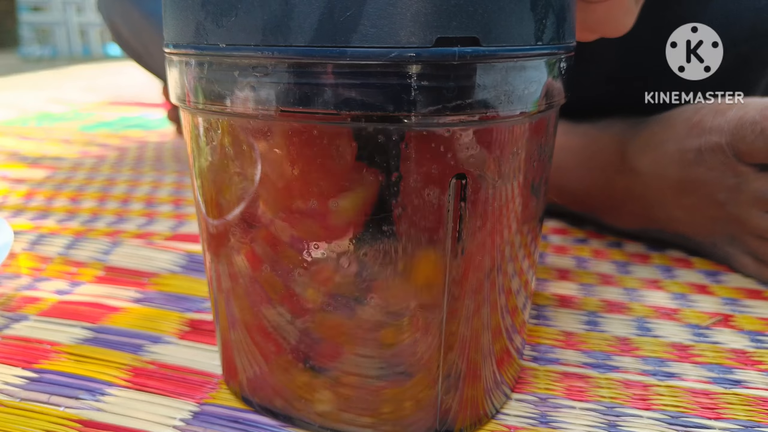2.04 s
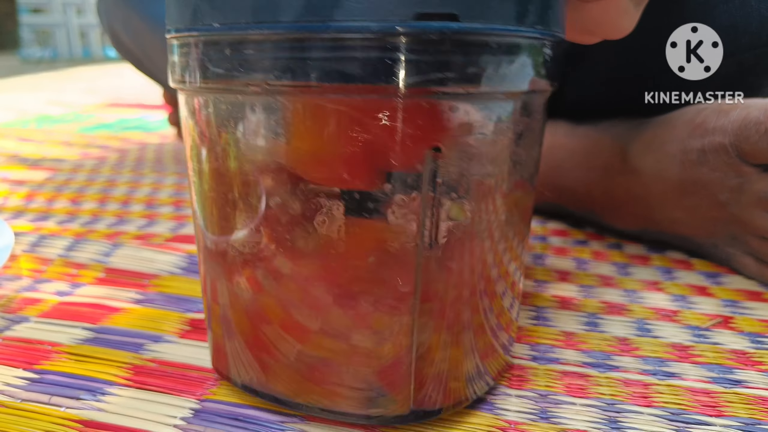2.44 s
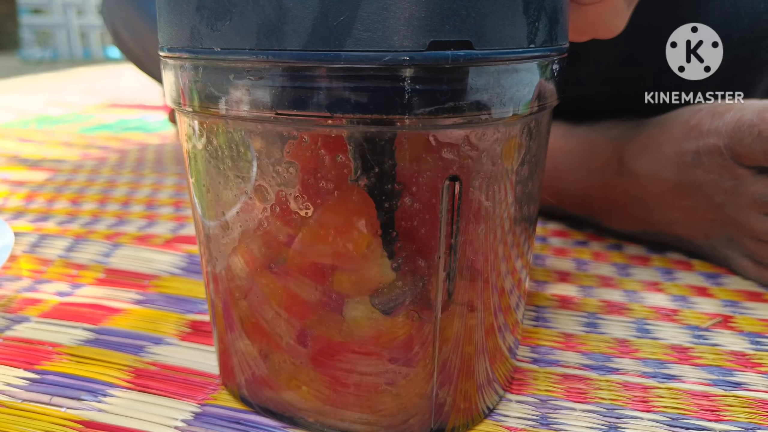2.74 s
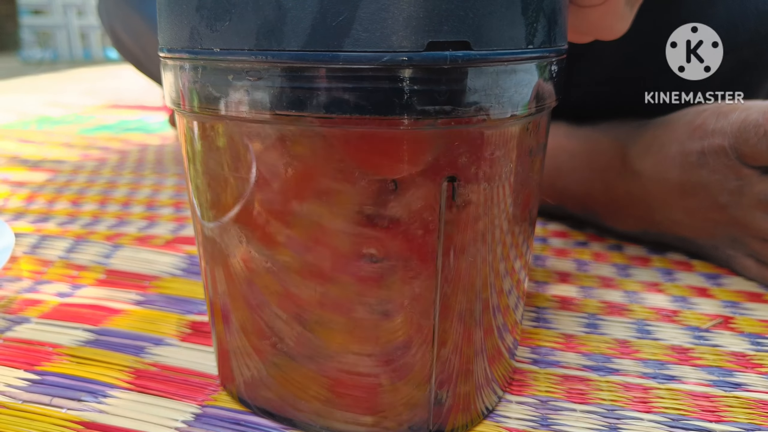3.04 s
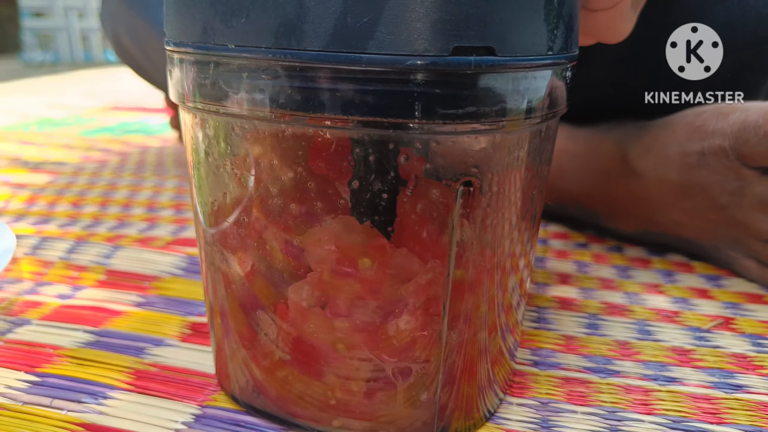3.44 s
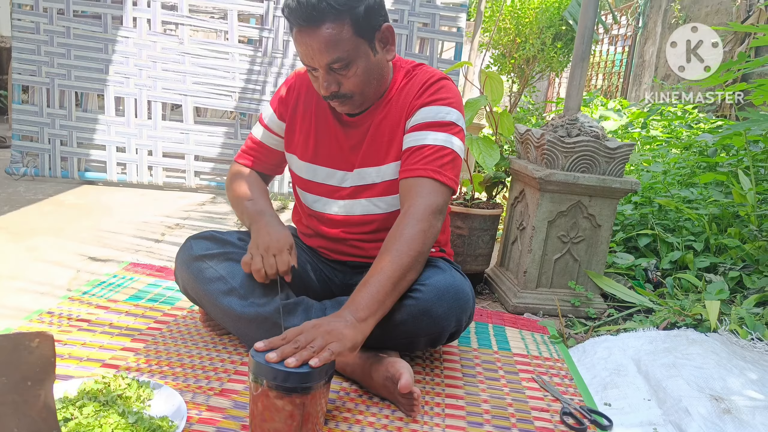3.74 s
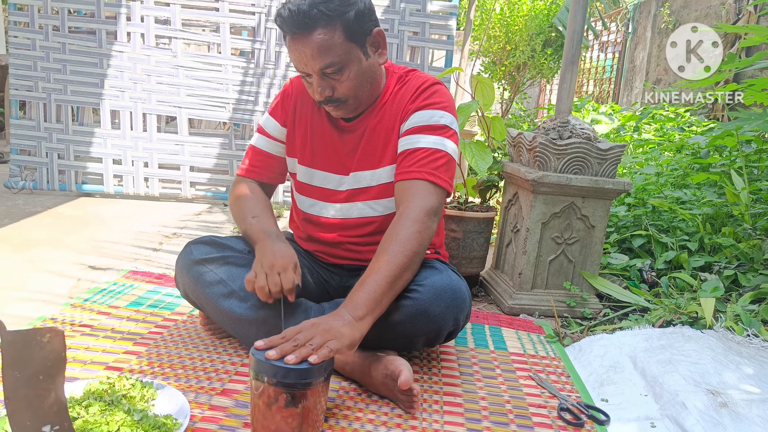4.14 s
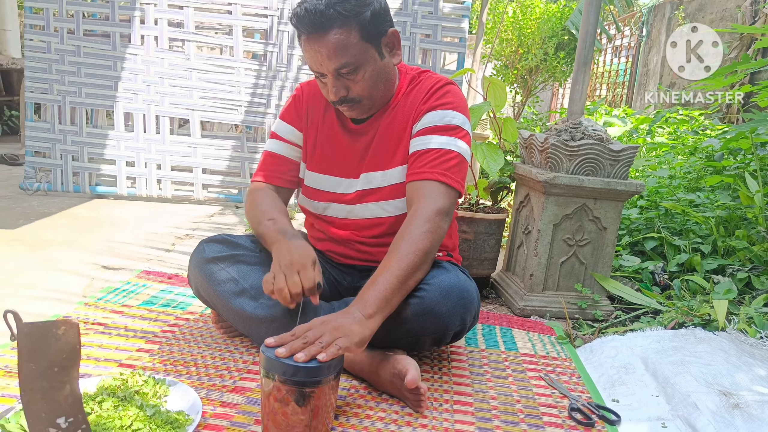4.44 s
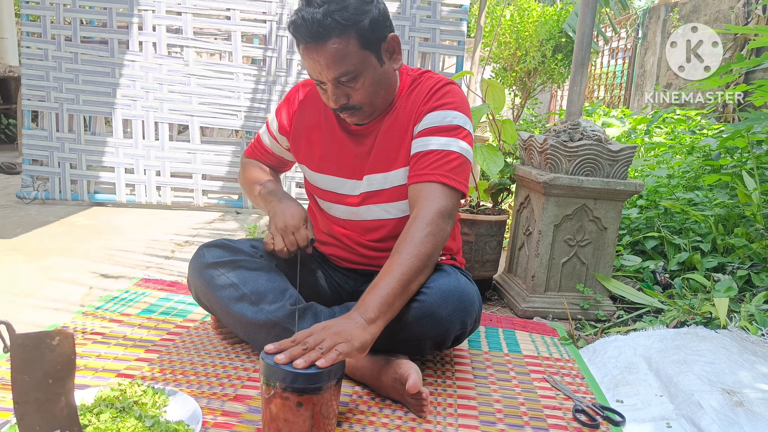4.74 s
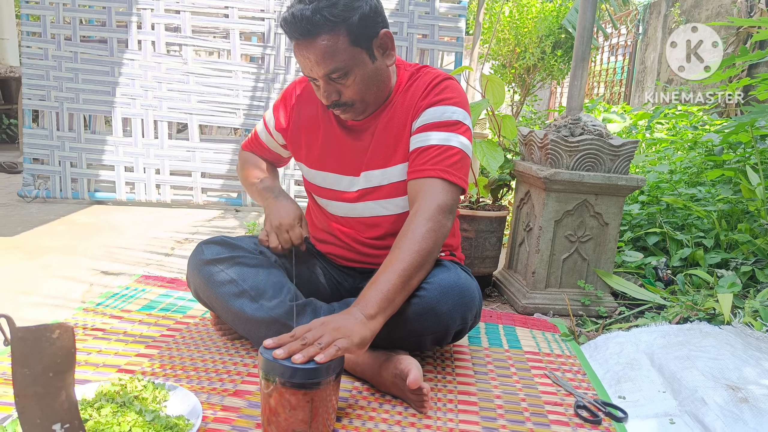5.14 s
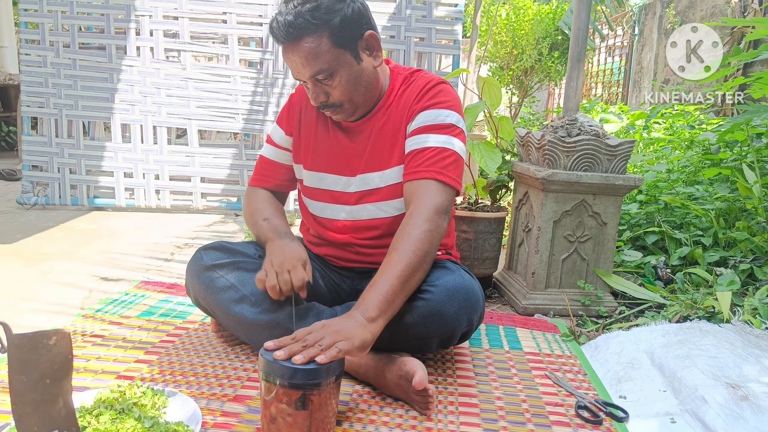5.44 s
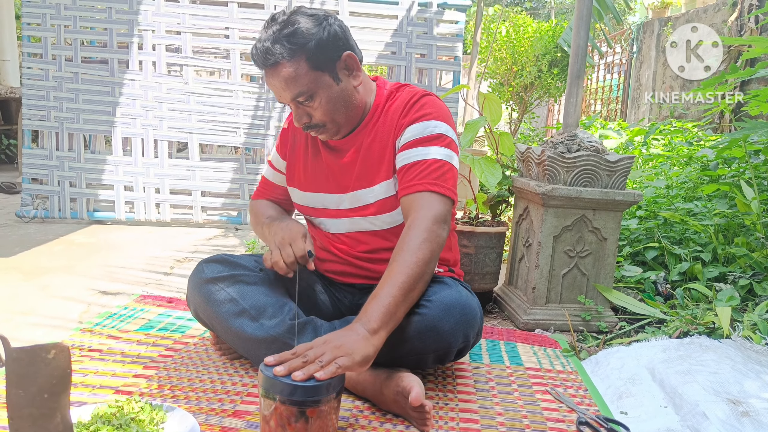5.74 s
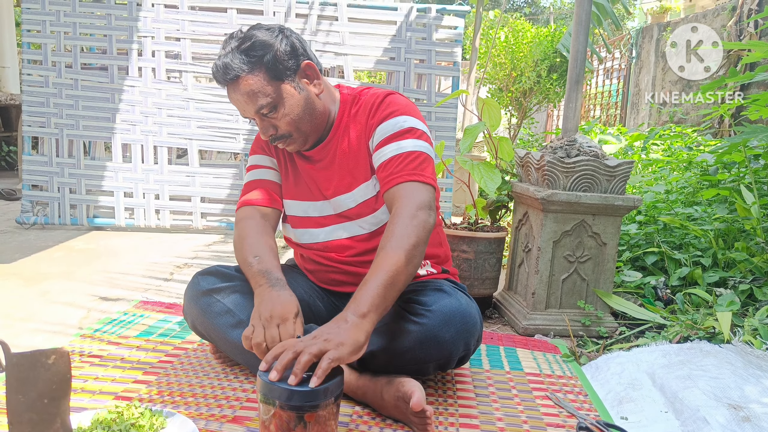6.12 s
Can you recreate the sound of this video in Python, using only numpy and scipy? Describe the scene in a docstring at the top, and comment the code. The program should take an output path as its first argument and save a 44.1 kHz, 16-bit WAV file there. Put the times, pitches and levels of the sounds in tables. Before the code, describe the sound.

Close stereo microphones catch a cord-driven vegetable chopper: hollow plastic knocking, gritty gear whir and wet pulp fizz on every pull, then a thinner ticking zip as the cord winds back. About two pulls come every 1.2 seconds at first. Then the view jumps back and the same action is softer, thinner and slightly faster, with a short yard reflection, quiet outdoor murmur and a brief breathy whistle at the end.

```python
"""Pull-cord food chopper in a yard

A hand pulls the cord of a food chopper on a mat outdoors, heard first from close by, then from a step away.
The clutch clacks as strokes set in; gears and blades grind and knock, ringing the modes of the plastic jar.
The ratchet ticks in the lid, clearest while the spring winds the cord back; cord and pulp fizz above.
Near the end a rough whistle, narrowly resonant noise, sounds over the quiet coloured noise of the open air."""
import sys
import numpy as np
from scipy import signal
from scipy.fft import rfft, irfft, next_fast_len
from scipy.io import wavfile
from scipy.ndimage import uniform_filter1d

SR = 44100
rng = np.random.default_rng(int(sys.argv[2]) if len(sys.argv) > 2 else 0)


def bounce(signal):
    """Save signal as a 16-bit WAV file at the path given by the first command-line argument."""
    frames = np.transpose(np.atleast_2d(signal))
    limited = np.clip(frames, -1, 1)
    pcm = np.round(limited * 32767).astype(np.int16)
    wavfile.write(sys.argv[1], SR, pcm)


N = 277075
FAR_FROM_S = 3.62  # from here on the chopper is heard from a step away


def gain_of(db):
    """Turns decibels into an amplitude factor."""
    return 10 ** (np.asarray(db) / 20)


def evened(x):
    """Brings a signal to an RMS of one."""
    return x / np.sqrt(np.mean(x ** 2) + 1e-20)


def curve(rows):
    """Joins rows (time [s], value, ..) by straight lines, one value a sample."""
    s, *columns = np.transpose(rows)
    return [np.interp(np.arange(N) / SR, s, c) for c in columns]


def blend(a, b, same):
    """Two channels from independent noises a and b, alike by the share same."""
    return np.array([a, same * a + np.sqrt(1 - same ** 2) * b])


def pair(count, same):
    """White noise for two microphones, alike by the share same."""
    a, b = rng.standard_normal((2, count))
    return blend(a, b, np.clip(same, 0, 1))


def slow_swing(span):
    """Slow random swing of RMS one: noise averaged twice over span samples."""
    return evened(uniform_filter1d(uniform_filter1d(rng.standard_normal(N), span), span))


def through(drive, body):
    """Plays a drive through the impulse response of a body, channel by channel."""
    return signal.oaconvolve(drive, body, axes=1)[:, :N]


def ring(modes, struck_hz=None, octaves=1.2):
    """Damped modes of a body after one click at both microphones; a blow favours those near struck_hz."""
    t, out = np.arange(1024) / SR, 0
    for k, (hz, width, left_db, right_db) in enumerate(modes):
        favour = 1
        if struck_hz is not None:
            favour = np.exp(-(np.log2(hz / struck_hz) / octaves) ** 2)
        mode = width * np.exp(-np.pi * width * t) * np.sin(2 * np.pi * hz * t)
        out = out + (-1) ** k * favour * gain_of([[left_db], [right_db]]) * mode
    return out / np.linalg.norm(out.mean(0))


def rattle(per_s, spread_db, grain_ms, same, smooth):
    """Uneven contacts: short noise bursts of random size, over a share of smooth rubbing."""
    size = gain_of(spread_db * np.minimum(rng.exponential(1, N), 4))
    size = size * (rng.random(N) < per_s / SR)
    spot, out = rng.integers(0, 16, N), np.zeros((2, N))
    t_ms = np.arange(400) / SR * 1000
    swell_and_fade = np.exp(-t_ms / grain_ms) * (1 - np.exp(-t_ms / (0.45 * grain_ms)))
    for k in range(16):  # every spot of contact weighs the modes in its own way
        burst = pair(count=400, same=same) * swell_and_fade
        out += through((size * (spot == k))[None], burst / np.linalg.norm(burst[0]))
    smooth = np.clip(smooth, 0, 1)
    return np.sqrt(1 - smooth) * evened(out) + np.sqrt(smooth) * pair(count=N, same=same)


# colour of the outdoor air: (frequency [Hz], relative level per Hz [dB])
AIR_COLOUR = [(20, -4), (40, -1), (110, 1.5), (170, -8.5), (300, 2.5), (550, -10), (700, -7.5),
              (1700, -13.5), (2500, -13.5), (3300, -22), (9000, -29), (15000, -46)]
# slow rise of the air and its sinking at the end: (time [s], level change [dB])
AIR_SWELL = [(0, -1.5), (5.9, 2.5), (6.28, -6)]
AIR_DB = -52  # RMS before the slow swell


def air():
    """Outdoor murk of coloured noise, alike in the bass and unrelated in the treble."""
    hz, (f, db) = np.fft.rfftfreq(N, 1 / SR), np.transpose(AIR_COLOUR)
    a, b = rfft(rng.standard_normal((2, N)), axis=1)
    same = .93 * np.exp(-hz / 2500)
    colour_db = np.interp(np.log(hz + 1), np.log(f + 1), db)
    murk = irfft(blend(a, b, same) * gain_of(colour_db), N, axis=1)
    return gain_of(AIR_DB + curve(AIR_SWELL)[0]) * evened(murk)


YARD_T60_S, YARD_DB = 0.058, -12


def yard(x):
    """Fence, wall and plants nearby scatter a short faint tail, another one to each microphone."""
    t = np.arange(SR // 5) / SR
    tail = rng.standard_normal((2, len(t))) * gain_of(-60 * t / YARD_T60_S) * (t > .004)
    return gain_of(YARD_DB) * through(x, tail / np.linalg.norm(tail[0]))


# glide of the whistle: (time [s], pitch [Hz], level before panning [dB])
WHISTLE_GLIDE = [(5.86, 2230, -79), (5.898, 2520, -53.5), (6.004, 2580, -62), (6.01, 2440, -50),
                 (6.114, 2270, -42.5), (6.124, 2360, -50.5), (6.182, 2540, -48.5), (6.218, 2400, -66),
                 (6.24, 2290, -59)]


def whistle():
    """Noise in a narrow wandering resonance, fluttering, mostly on the right."""
    hz, db = curve(WHISTLE_GLIDE)
    turn = np.exp(2j * np.pi * np.cumsum(hz) / SR)
    r = np.exp(-np.pi * 260 / SR)  # each smoothing pass is 260 Hz wide
    # shifted down by the pitch, smoothed around zero, shifted back up
    x = rattle(150, spread_db=-2.5, grain_ms=5.6, same=0.48, smooth=0.33) / turn
    for _ in range(2):
        x = signal.lfilter([1 - r], [1, -r], x)
    t = np.arange(N)
    sounding = (t > WHISTLE_GLIDE[0][0] * SR) & (t < WHISTLE_GLIDE[-1][0] * SR)
    return gain_of(db) * evened((turn * x).real) * gain_of([[-7], [4]]) * sounding


# colour of the fizz at both microphones:
# (frequency [Hz], width [Hz], relative level left [dB], relative level right [dB])
FIZZ_MODES = [(6700, 530, -48, 3.5), (8350, 2000, -0.5, 1.5), (9360, 1350, 3.5, -1.5),
              (12900, 480, -14, -12), (14500, 2300, -34, -18.5)]


def fizz_body():
    """Broad treble resonances that colour the fizz of cord and pulp."""
    return ring(FIZZ_MODES)


# modes of jar and lid, from close by and from a step away:
# (frequency [Hz], width [Hz], relative level left [dB], relative level right [dB])
JAR_NEAR_MODES = [(131, 270, -16, -11), (417, 83.7, 7, 2), (703.5, 111, 1, 0), (1027.4, 113, 2.5, 2.3),
                  (1310, 174, 4.5, 2), (1483, 304, 2.5, 1.5), (2090, 785, -9.5, -9.5),
                  (3930, 610, -17.5, -17.5)]
JAR_FAR_MODES = [(336, 88, -5.5, -3.5), (491, 61, 4.5, 4), (654, 168, -6.5, -5), (1150, 111, -0.9, -4.1),
                 (1388, 284, -10, -11.5), (1650, 120, -7.5, -8), (1960, 184, -9.5, -1.5),
                 (2284, 320, -17.5, -5), (2816, 290, -22.5, -9)]
LID_NEAR_MODES = [(3550, 1460, -11.5, -5), (4075, 1400, -38, -0.5), (5160, 700, -45, -4.5),
                  (5580, 267, -8, 4.5), (5515, 1200, -34, -0.5)]
LID_FAR_MODES = [(3970, 4500, -8, -4), (4410, 220, 3.5, 6), (4700, 190, -13, 0), (5120, 390, 2.5, 5.5),
                 (5770, 250, -6, -2.5)]
GROUND_MS, GROUND_SHARE = 0.6, 0.38  # from afar the mat throws the jar back a little later


def bodies(far, **struck):
    """Jar and lid as heard from either place; the small jar radiates no deep bass."""
    bass_cut = signal.butter(2, 260 if far else 90, "high", fs=SR)
    jar = signal.lfilter(*bass_cut, ring(JAR_FAR_MODES if far else JAR_NEAR_MODES, **struck))
    if far:
        late = round(GROUND_MS * SR / 1000)
        jar = jar + GROUND_SHARE * np.pad(jar, ((0, 0), (late, 0)))[:, :jar.shape[1]]
    lid = ring(LID_FAR_MODES if far else LID_NEAR_MODES, **{})
    return jar / np.linalg.norm(jar.mean(0)), lid


def blows(rows):
    """Each blow is a short chatter that swells and stops; it rings jar, lid and fizz."""
    out, t_ms = np.zeros((2, N + 4096)), np.arange(1024) / SR * 1000
    edge = fizz_body()
    for s, jar_db, lid_db, fizz_db, ms, hz in rows:
        shape = (1 - np.exp(-t_ms / (0.5 * ms))) * np.exp(-(t_ms / (1.43 * ms)) ** 2)
        late_shape = shape * (1 - np.exp(-t_ms / (0.32 * ms)))  # lid and fizz swell later
        jar, lid = bodies(s > FAR_FROM_S, struck_hz=hz, octaves=2.68)
        low = through(shape * pair(count=1024, same=0.97), jar)
        high = through(late_shape * pair(count=1024, same=0.27), lid + gain_of(fizz_db) * edge)
        low, high = low / abs(low.mean(0)).max(), high / abs(high.mean(0)).max()
        sound = gain_of(jar_db) * low + gain_of(lid_db) * high
        out[:, round(s * SR):][:, :sound.shape[1]] += sound
    return out[:, :N]


# clearest clicks of the ratchet, the first being a faint click that leads into the first clutch clack: (time
# [s], peak in the lid [dB], jar part against it [dB], # fizz against the lid modes [dB], chatter length [ms])
RATCHET_CLICKS = [(0.0204, -36, 10, -2, 4.6), (0.4219, -35, 18, -4, 3.7), (0.4466, -28, -4, -5, 2.7),
                  (0.4597, -24.5, 4.5, -9, 3.5), (0.4967, -30, -5, -6, 4.2), (0.5701, -27, 3, 0, 3.5),
                  (1.093, -29.5, -10, -12, 3.5), (1.1213, -31.5, 5, -10, 3.5), (1.151, -30, 0, -10, 3.5),
                  (1.1654, -26, -6, -7, 2.8), (1.191, -28, -1, -12, 3.2), (1.2198, -28, -4, -9, 4.1),
                  (1.2545, -35, -14, -11, 4), (1.3069, -30.5, 0.5, -8, 4.3), (1.335, -42, 11, -5, 3.9),
                  (1.6891, -33, 12.5, -9, 2.8), (1.715, -40, 16, -4, 2.7), (1.737, -27.5, -12, -14, 2.7),
                  (1.7845, -26, 7.5, -12, 2.8), (1.8233, -25.5, -6, -18, 2.6), (2.2652, -32.5, 5, -6, 3),
                  (2.2886, -30.5, 3.5, -12, 3.2), (2.3639, -19, -3.5, 3, 2.8), (2.4538, -36, 9, -21, 3.1),
                  (2.4998, -27, 3, -20, 4.6), (2.818, -38, 11, -11, 3.9), (2.911, -30, -1, -2, 3.5),
                  (2.9736, -42, 8, -15, 3.1), (3.019, -48, 0, -18, 3.5), (3.3328, -31.5, -15, -11, 3.1),
                  (3.4072, -23.5, -4, -6, 3.4), (3.4288, -25.5, -8, -12, 2.9),
                  (3.4537, -25.5, -12, -9, 3.5), (3.4705, -25, -12, -10, 2.6), (3.501, -25.5, -1, -17, 3.5),
                  (3.6313, -41.5, 13, 3, 3.9), (3.685, -43, -3, 4, 3.5), (3.7, -27, -15, -7, 4),
                  (4.0114, -36, -7, -7, 3.1), (4.086, -35, 0, -7, 3.8), (4.143, -33, 0, -14, 3.5),
                  (4.4488, -38, -1, -13, 3), (4.5775, -32.5, 2, -12, 3.8), (4.8834, -44, -4, -16, 3.2),
                  (4.9327, -33.5, -1, 7, 3.5), (4.9741, -31.5, -6, 3, 3.3), (5.3228, -41, 3, -8, 3.3),
                  (5.3935, -29.5, -1.5, 9, 3.6), (5.4154, -33, -5, 6, 3.5), (5.7834, -40.5, 2.5, -12, 3.8),
                  (5.859, -51, -13, -22, 3.5), (5.9269, -41, -1, -11, 4.3), (5.9863, -49, -3, -18, 3.5),
                  (6.112, -49.5, 8.5, -18, 3.2), (6.1314, -52.5, 9, -16, 3.5), (6.1655, -63, 7, -15, 3.5),
                  (6.197, -55, 9, -18, 3.5)]
CLICK_HZ = 910


def ratchet_clicks():
    """Single ratchet teeth click in the lid and nudge the jar around one pitch; the first click leads into the
    first clack."""
    return blows([(s, db + jar_db, db, fizz_db, ms, CLICK_HZ)
                  for s, db, jar_db, fizz_db, ms in RATCHET_CLICKS])


# the clutch bites as a stroke sets in:
# (time [s], peak in the jar [dB], favoured pitch [Hz], lid part against it [dB])
CLUTCH_CLACKS = [(0.031, -11.5, 1530, -11.5), (0.734, -7.5, 1570, -13), (1.373, -15, 385, -9),
                 (1.972, -6.5, 1310, -11), (2.51, -7, 398, -11.5), (3.065, -11, 466, -8.5),
                 (3.574, -13.5, 1110, -7), (3.785, -20.5, 1650, -9.5), (4.221, -20, 1960, -5),
                 (4.66, -13.5, 484, -9.5), (5.093, -29.5, 1960, 0.5), (5.522, -20.5, 2160, -3)]
CLACK_MS, CLACK_FIZZ_DB = 4.4, -6  # chatter length; fizz against the lid modes


def clutch_clacks():
    """The biting clutch strikes jar and lid with a short chatter."""
    return blows([(s, db, db + lid_db, CLACK_FIZZ_DB, CLACK_MS, hz)
                  for s, db, hz, lid_db in CLUTCH_CLACKS])


# blades and gears hit the jar:
# (time [s], peak in the jar [dB], favoured pitch [Hz], chatter length [ms])
JAR_KNOCKS = [(0.111, -23, 662, 3.1), (0.123, -18, 816, 2.3), (0.188, -11, 400, 1.7), (0.207, -3, 766, 2),
              (0.24, -1, 441, 2.16), (0.276, -7.5, 380, 1.34), (0.329, -20, 514, 4.7),
              (0.772, -7.5, 370, 1.7), (0.824, -16.5, 700, 1.5), (0.866, -9, 471, 1.55),
              (0.877, -4, 1300, 2.6), (0.888, 4.5, 440, 1.4), (0.912, -3.5, 1040, 2.8),
              (0.921, -4, 1400, 2.3), (0.926, -6, 1320, 2.4), (0.93, -9.5, 1050, 1.5),
              (0.97, -9, 1360, 2.6), (0.989, -8.5, 1310, 2.8), (1.452, -12.5, 350, 2.1),
              (1.485, -4, 440, 2.2), (1.498, -31, 638, 2.1), (1.563, -4, 1240, 3.6), (1.593, -6, 1040, 2.2),
              (2.011, -14.5, 1080, 1.9), (2.031, -5, 483, 1.64), (2.045, -8.5, 506, 3.1),
              (2.057, -4, 1640, 3.2), (2.069, -2, 1280, 2.6), (2.081, -4, 1360, 1.8),
              (2.089, -5.5, 1030, 2.4), (2.098, -4.5, 1080, 1.9), (2.137, -6.5, 388, 1.4),
              (2.162, -4, 1400, 2), (2.167, -4.5, 1430, 2.7), (2.568, -9, 573, 1.8),
              (2.628, -11.5, 452, 1.3), (2.647, -10, 1060, 3), (2.66, -5, 1410, 2.2),
              (2.67, -6.5, 1080, 2.3), (2.682, -5.5, 1420, 2.6), (2.702, -12, 423, 3.2),
              (2.736, -15, 380, 3.6), (3.111, -4, 704, 1.8), (3.147, -6.5, 455, 1.7),
              (3.175, -1.5, 1300, 2.3), (3.217, -1.5, 1260, 1.5), (3.243, -2.5, 1090, 2.8),
              (3.664, -20, 2100, 2.9), (3.837, -17.5, 1230, 6.3), (3.849, -19, 1320, 2.1),
              (3.891, -11.5, 1190, 0.9), (3.957, -19, 476, 3.6), (4.325, -17.5, 1180, 2.2),
              (4.364, -20.5, 541, 2.5), (4.405, -27, 490, 1.7), (4.679, -24, 517, 2.1),
              (4.738, -15, 2120, 1.5), (4.761, -15.5, 1200, 0.8), (4.78, -12.5, 1230, 2.1),
              (4.839, -23.5, 1190, 0.7), (5.164, -24, 1140, 1.3), (5.176, -26, 544, 2.8),
              (5.204, -24, 468, 1.8), (5.59, -18.5, 497, 1.3), (5.704, -26, 474, 1.5)]
KNOCK_LID_DB, KNOCK_FIZZ_DB = -33, -15  # lid part against the jar; fizz against the lid modes


def jar_knocks():
    """Blades and gears knock the jar, exciting mostly the modes near each pitch."""
    return blows([(s, db, db + KNOCK_LID_DB, KNOCK_FIZZ_DB, ms, hz)
                  for s, db, hz, ms in JAR_KNOCKS])


COAST_DB_PER_S = (-60, -400, -400)  # after a stroke the blades coast on in the jar; lid and fizz stop
EDGE_S = .008  # a stroke sets in within this time


def strokes(rows, start_db, end_db, bends):
    """Powers of jar, lid and fizz: each stroke speeds up, runs at speed and slows down."""
    t, power = np.arange(N) / SR, np.zeros((3, N))
    for start, rise, hold, fall, *top_db, lean_db in rows:
        u = t - start
        before = np.clip(1 - u / rise, 0, 1)
        after = np.clip((u - rise - hold) / fall, 0, 1)
        db = np.outer(start_db, before ** bends[0]) + np.outer(end_db, after ** bends[1])
        db += np.c_[top_db] + lean_db * np.clip((u - rise) / hold, 0, 1)
        db += np.outer(COAST_DB_PER_S, np.maximum(u - rise - hold - fall, 0))
        power += (np.clip(u / EDGE_S, 0, 1) * gain_of(db)) ** 2
    return power


# pulls of the cord and rewinds by the spring: (start [s], speeding up [s], at speed [s], slowing [s],
# grinding in the jar [dB], rattle of the lid [dB], fizz of cord and pulp [dB], change while at speed [dB])
PULL_STROKES = [(.045, 0.15, 0.12, 0.058, -24, -41.5, -43.5, 8),
                (.75, 0.14, 0.074, 0.13, -18.5, -37.5, -42, -5.5),
                (1.39, 0.13, 0.048, 0.085, -16.5, -38, -43.5, 1),
                (1.985, 0.072, .11, .08, -19, -40, -43, -3), (2.525, 0.13, 0.05, 0.047, -18, -40, -43.5, 0),
                (3.08, 0.029, 0.13, 0.059, -25, -48, -48.5, 8.5),
                (3.8, 0.069, 0.092, 0.064, -23, -49, -52, -9.5),
                (4.235, 0.096, 0.054, 0.079, -27.5, -52.5, -55, -5),
                (4.675, 0.063, 0.088, 0.07, -24, -52.5, -55, -8.5),
                (5.105, 0.076, 0.066, 0.065, -31, -54, -58.5, -3),
                (5.535, 0.043, 0.12, 0.074, -28.5, -53, -57.5, -4.5)]
REWIND_STROKES = [(.42, 0.059, .18, 0.044, -34, -46, -53.5, 2.5),
                  (1.094, 0.077, 0.057, 0.19, -30, -43, -46, -4.5),
                  (1.688, 0.068, .15, 0.065, -29.5, -40.5, -45, -2),
                  (2.265, 0.081, 0.11, 0.042, -30.5, -40, -50, -3),
                  (2.82, 0.049, 0.13, 0.16, -36.5, -53, -57, -3.5),
                  (3.32, 0.021, 0.18, 0.081, -40, -49, -59, 1.5),
                  (3.59, 0.069, 0.028, 0.13, -39, -40, -43, -3.5),
                  (4.01, 0.067, 0.028, 0.16, -40.5, -44, -48, 3),
                  (4.447, 0.093, 0.046, 0.14, -40.5, -41.5, -49.5, -3),
                  (4.882, 0.079, 0.049, 0.091, -44, -46.5, -49, 0),
                  (5.32, 0.089, .06, 0.12, -42, -47.5, -51.5, -2.5),
                  (5.783, .115, 0.08, 0.23, -53.5, -57.5, -70, 1.5)]
# level at the start and at the end of a stroke against full speed: (jar [dB], lid [dB], fizz [dB])
PULL_START_DB, PULL_END_DB = (-18, -16, -12), (-26, -22, -21)
REWIND_START_DB, REWIND_END_DB = (-9.5, -14.5, -21.5), (-18, -21, -30.5)
PULL_BENDS, REWIND_BENDS = (0.68, 0.97), (0.68, 0.9)  # exponents (rise, fall); higher stays near the top longer


def cord_work():
    """Powers of jar, lid and fizz while the hand pulls, and for pulls and rewinds together."""
    pulling = strokes(PULL_STROKES, PULL_START_DB, PULL_END_DB, PULL_BENDS)
    rewinding = strokes(REWIND_STROKES, REWIND_START_DB, REWIND_END_DB, REWIND_BENDS)
    return pulling, pulling + rewinding


# (near, from afar)
GRIND_SPREAD_DB = 3, 3  # unevenness of the contacts
LUMPS_DB = 2.37, 1.0  # RMS of the slow swings
REWIND_CALM = 0.79  # share of the unevenness that is left while the spring rewinds


def grinding(level, is_pull):
    """Gears and blades grind in rough contacts; chunks and gaps swing the level."""
    near = np.arange(N) < FAR_FROM_S * SR
    uneven_db = np.where(near, *GRIND_SPREAD_DB) * np.where(is_pull, 1, REWIND_CALM)
    lumps = slow_swing(400)  # blades meet chunks and gaps
    contacts = rattle(450, spread_db=uneven_db, grain_ms=1.0, same=0.91, smooth=0.23)
    return level * gain_of(np.where(near, *LUMPS_DB) * lumps) * contacts


def ticking(level):
    """The ratchet's short dense contacts in the lid flutter in level."""
    flutter = slow_swing(220)  # the pawl catches and slips
    return level * gain_of(2.1 * flutter) * rattle(350, spread_db=5.0, grain_ms=0.55, same=0.27, smooth=0.46)


def chopper():
    """Grinding rings the jar, ratchet ticks ring the lid, cord and pulp fizz above."""
    pulling, work = cord_work()
    in_jar, in_lid, above = np.sqrt(work)
    grind = grinding(in_jar, is_pull=pulling[0] > work[0] / 2)
    ticks = ticking(in_lid)
    fizz = above * rattle(460, spread_db=3.0, grain_ms=2.0, same=0.13, smooth=0.081)
    out = through(fizz, fizz_body())
    for far in (False, True):
        jar, lid = bodies(far)
        here = (np.arange(N) >= FAR_FROM_S * SR) == far
        out += through(grind * here, jar) + through(ticks * here, lid)
    return out


def scene():
    """Chopper, blows and whistle with their scattered tail, over the air."""
    work = chopper() + clutch_clacks() + jar_knocks() + ratchet_clicks() + whistle()
    return work + yard(work) + air()


# each microphone port swallows one band, left then right: (frequency [Hz], width [Hz], depth [dB])
PORT_BANDS = [(6950, 850, -17), (10300, 900, -22)]
EDGE_HZ = 15600  # band limit
RIGHT_LAG = 5  # samples


def record(dry):
    """Port dips, the later arrival at the right microphone, soft overload, then the band limit."""
    size = next_fast_len(N + 2048)
    hz = np.fft.rfftfreq(size, 1 / SR)
    z = rfft(dry, size, axis=1)
    for k, (dip_hz, width, depth_db) in enumerate(PORT_BANDS):
        detune = 1j * (hz - dip_hz) / width
        z[k] *= (gain_of(depth_db) + detune) / (1 + detune)
    z += (z.mean(0) - z) / (1 + (hz / 90) ** 2)  # long waves reach both ports alike
    z[1] *= np.exp(-2j * np.pi * hz * RIGHT_LAG / SR)
    heard = np.tanh(irfft(z, size, axis=1)[:, :N])
    band_limit = signal.firwin(511, EDGE_HZ, window=("kaiser", 9), fs=SR)
    return signal.oaconvolve(heard, band_limit[None], "same")


dry = scene()
out = record(dry)
bounce(out)
```